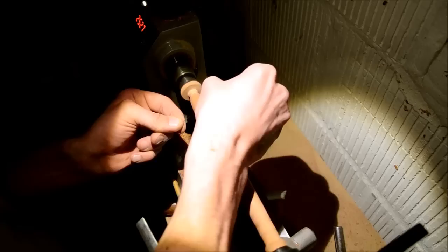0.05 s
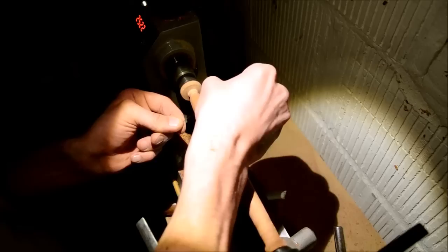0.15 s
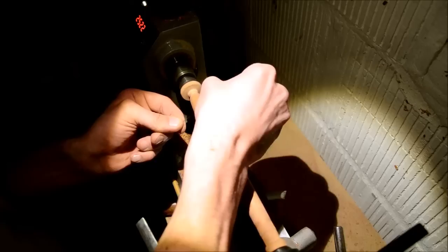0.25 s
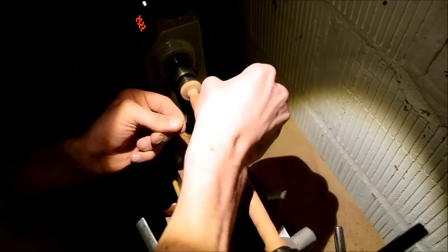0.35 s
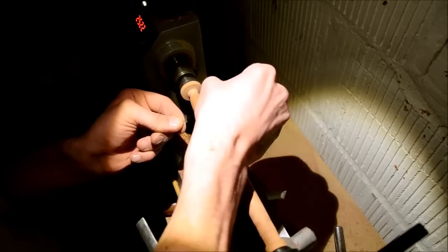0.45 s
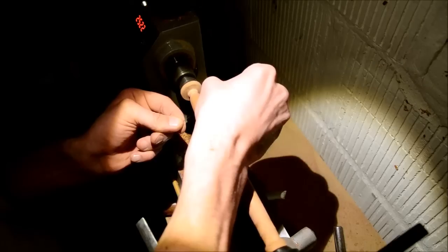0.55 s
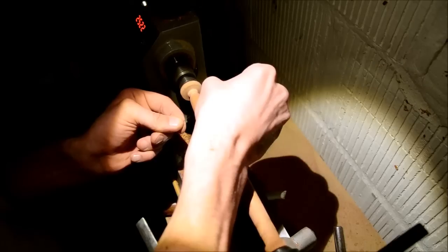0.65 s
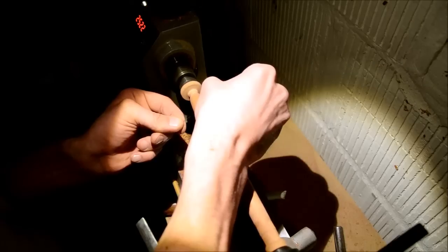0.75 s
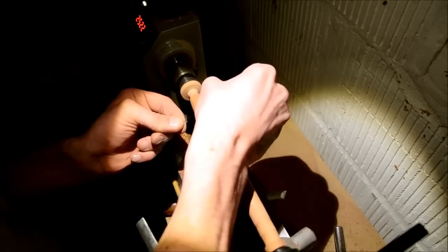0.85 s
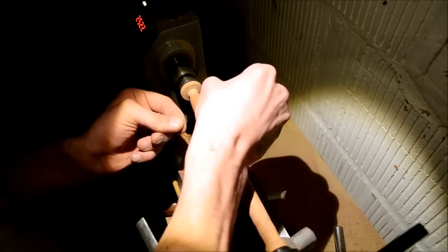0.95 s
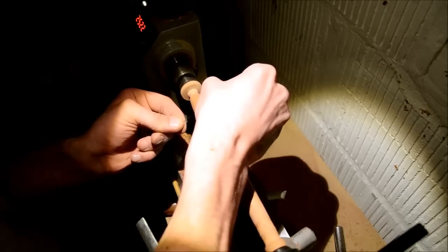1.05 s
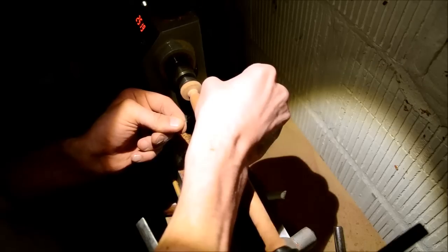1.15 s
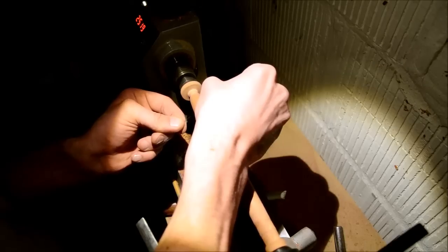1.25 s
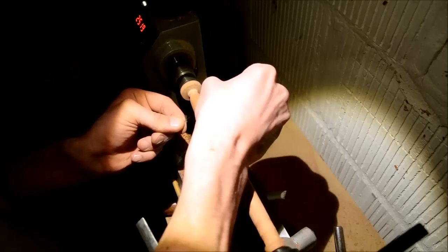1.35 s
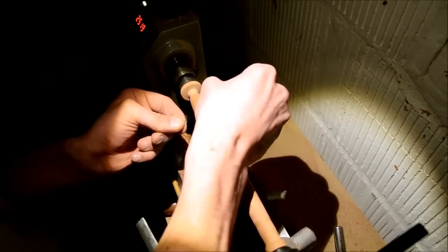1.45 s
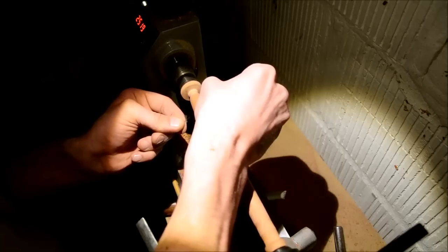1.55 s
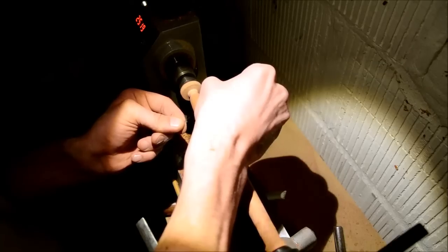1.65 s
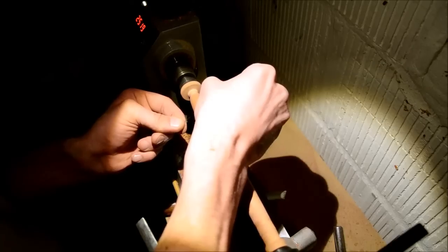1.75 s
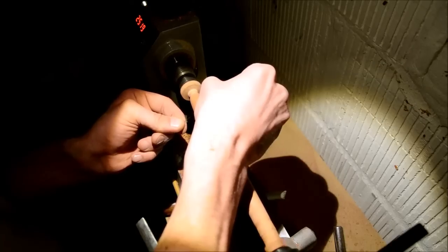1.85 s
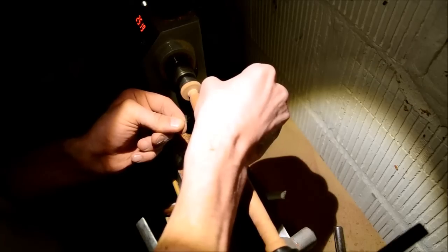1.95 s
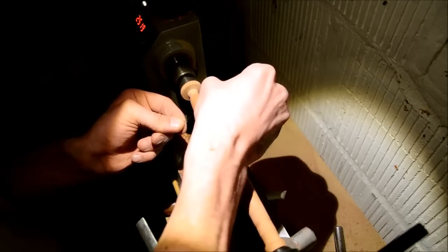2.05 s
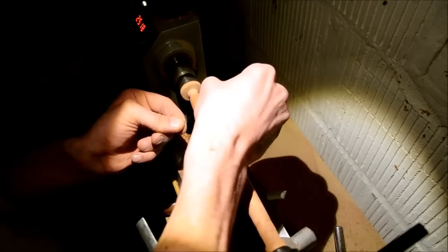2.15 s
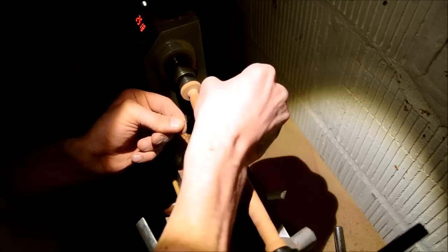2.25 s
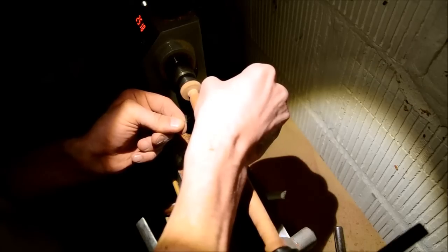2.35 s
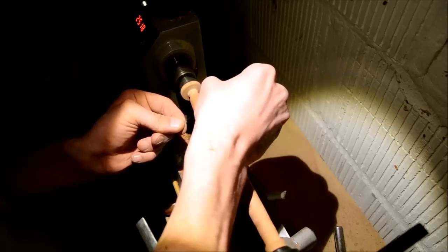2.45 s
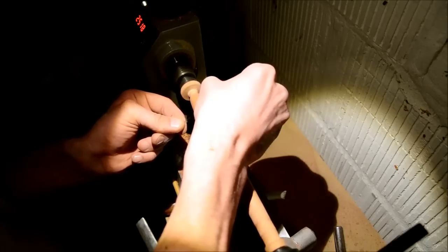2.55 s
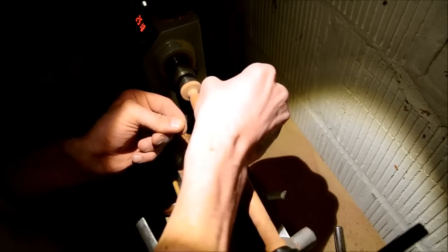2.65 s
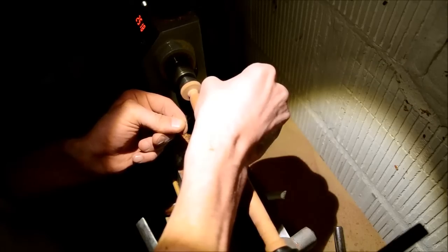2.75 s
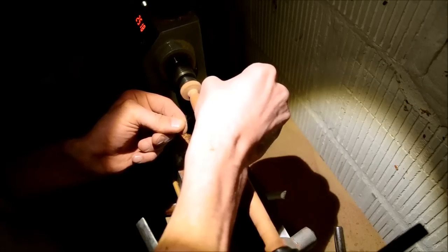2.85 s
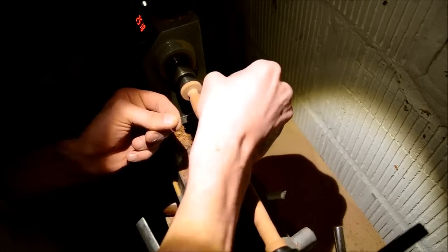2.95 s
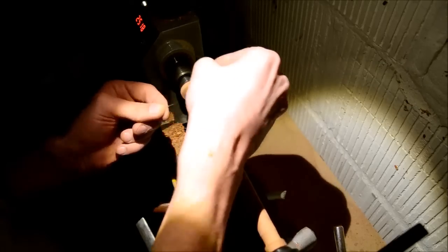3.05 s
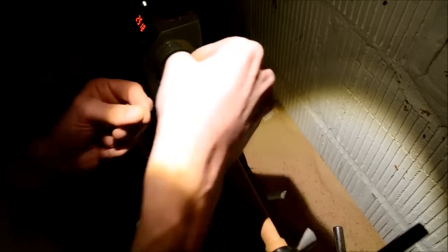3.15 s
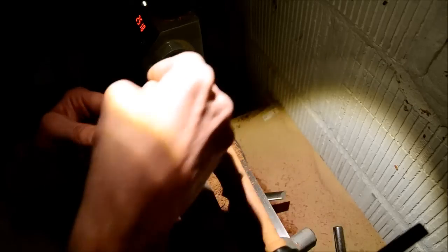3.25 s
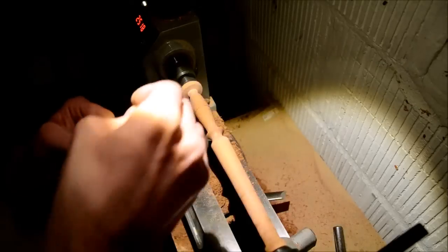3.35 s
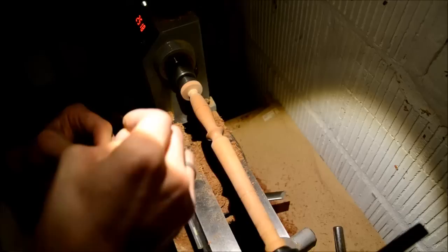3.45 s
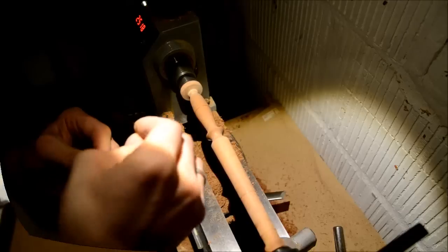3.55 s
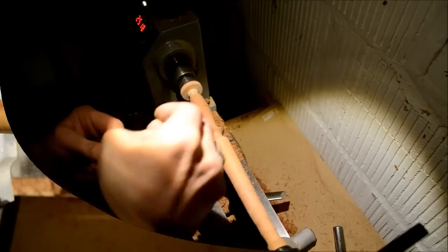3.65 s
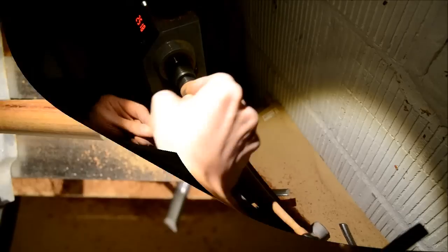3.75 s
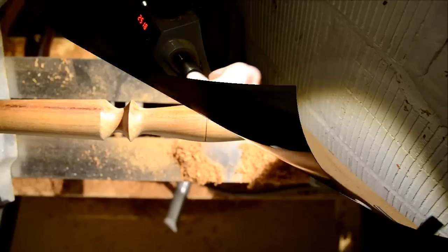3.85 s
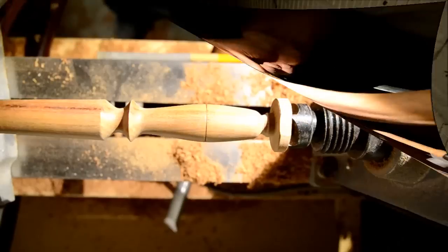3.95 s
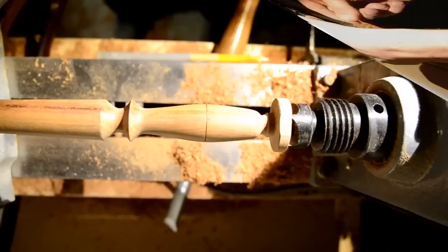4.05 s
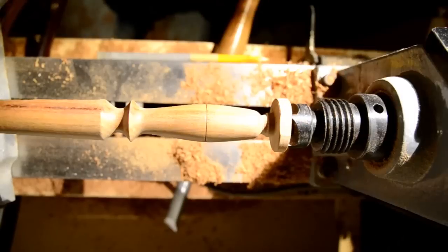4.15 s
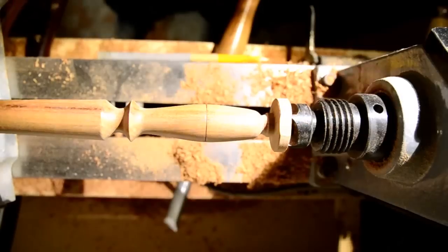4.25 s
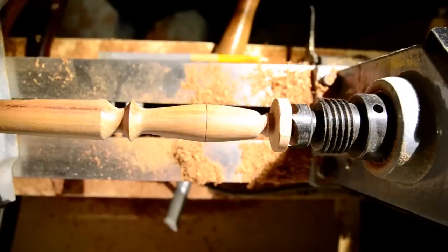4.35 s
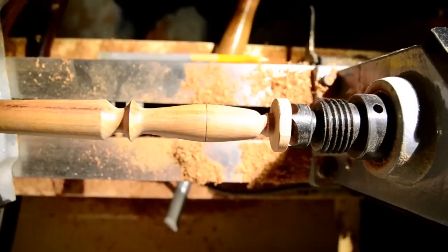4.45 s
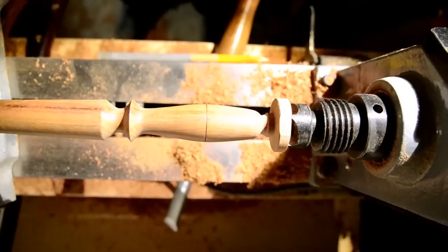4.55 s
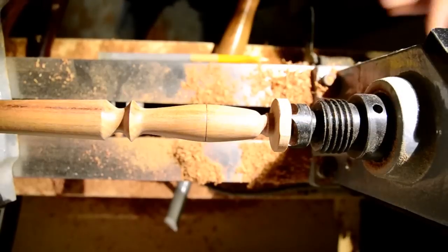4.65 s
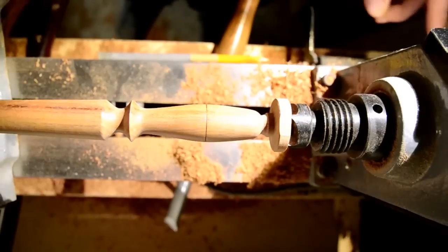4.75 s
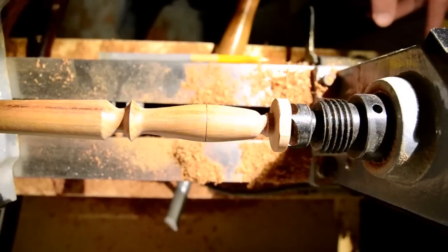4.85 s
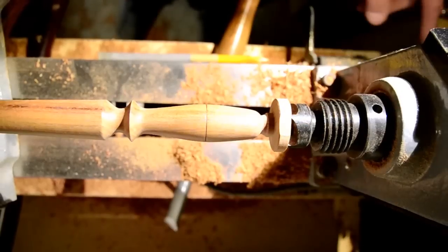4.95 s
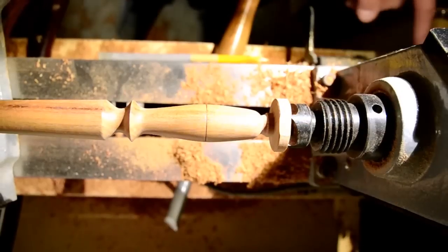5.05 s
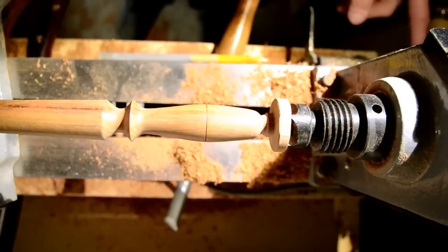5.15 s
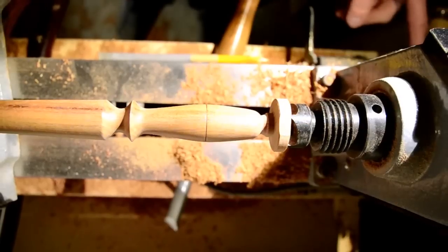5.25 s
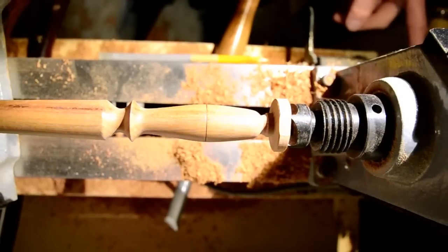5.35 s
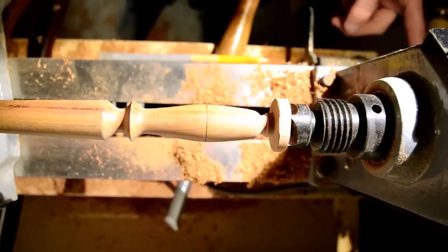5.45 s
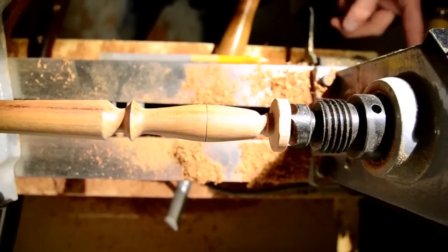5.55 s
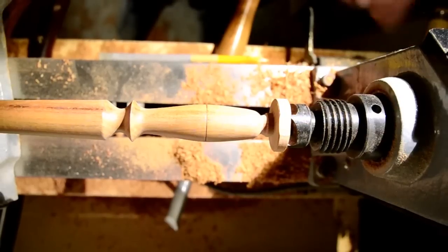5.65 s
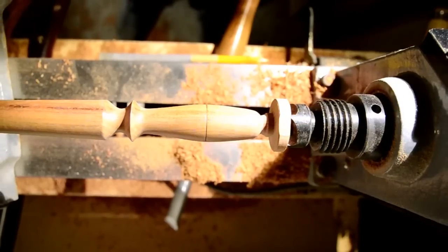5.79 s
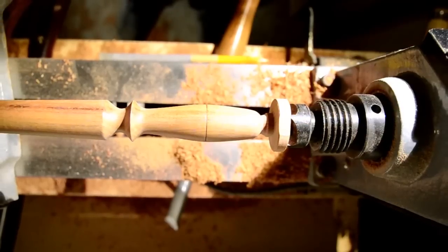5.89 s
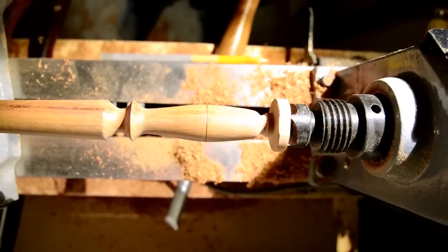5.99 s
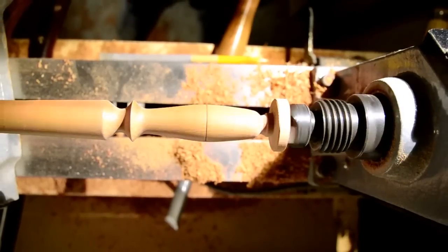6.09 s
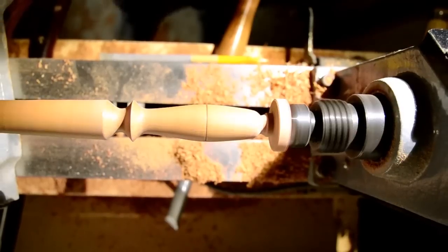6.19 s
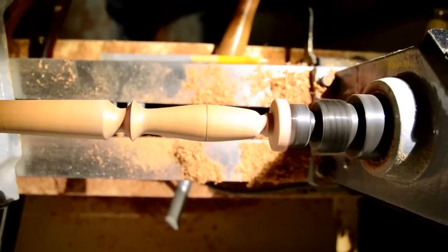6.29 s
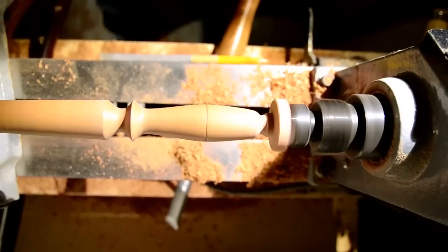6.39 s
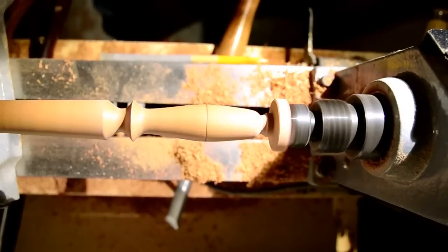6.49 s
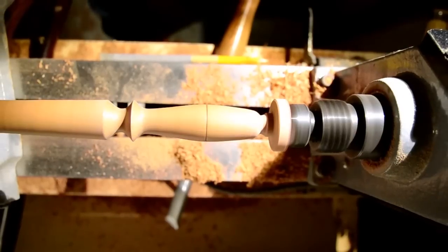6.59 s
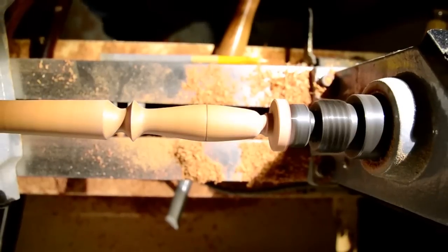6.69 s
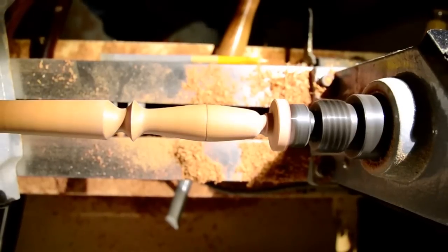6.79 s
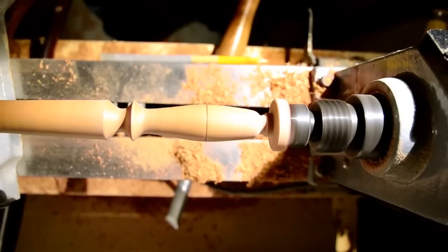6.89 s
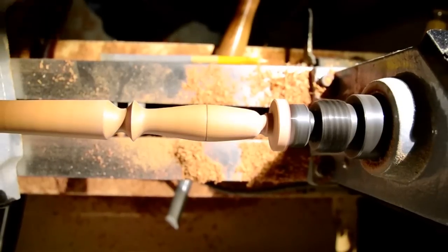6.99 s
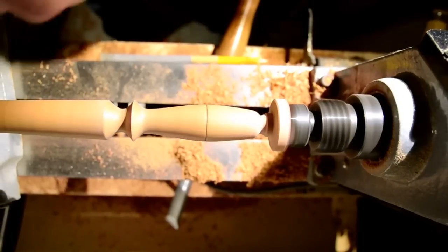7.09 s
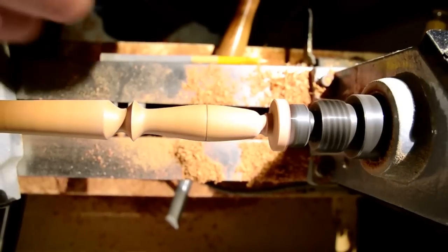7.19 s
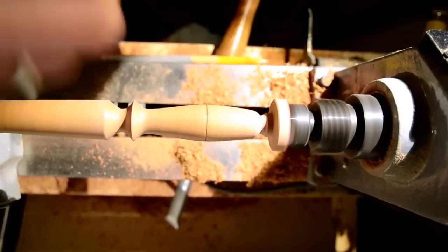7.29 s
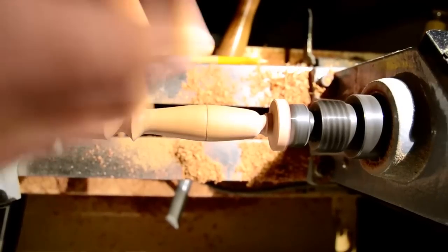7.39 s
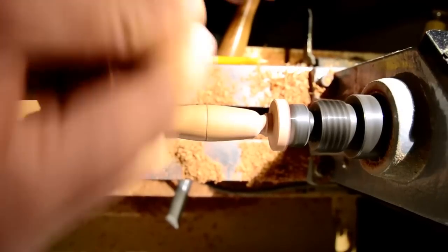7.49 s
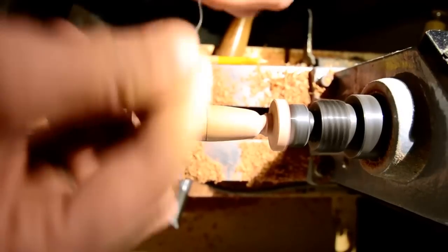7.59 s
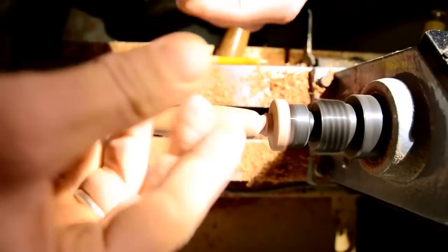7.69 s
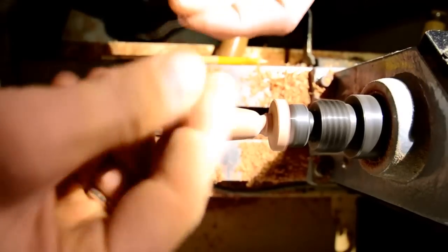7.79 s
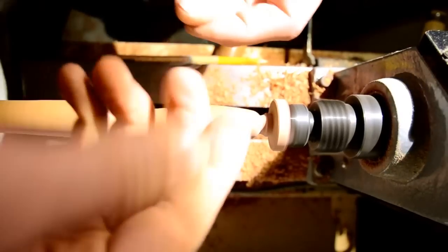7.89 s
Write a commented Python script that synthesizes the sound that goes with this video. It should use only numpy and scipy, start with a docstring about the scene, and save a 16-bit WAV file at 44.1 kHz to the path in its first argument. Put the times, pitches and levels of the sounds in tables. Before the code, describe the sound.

From 0 to 4.2 seconds a small wood lathe runs at constant speed, heard close up in a workshop: a steady hum around 350 hertz, beating slowly about twice a second, over a gritty rattle repeating roughly eleven times a second, with thin bearing whines and a tiny chirp each turn. Around 3.15 it grows very slightly louder. At 4.2 it cuts instantly to quiet room tone with faint mains hum. Sleeve rustles and swishes come between 4.2 and 5, with light taps, one duller near 4.9. At 5.43 the switch clacks sharply, with a small after-tap at 5.58. At about 6.06 the motor starts; its pitch climbs rapidly for a second, swelling through metallic resonances, then settles by 7 into a bright, rattling whir. Short loose-part buzzes chatter from 7.25 to the end near 8.

```python
"""A small wood lathe spins a wooden handle: drive tones beat slowly over a rattle that repeats every turn.
The sound then cuts to the lathe at rest, heard from beside the headstock: a sleeve rustles, the start
switch clacks and the spindle runs up to speed again. Tones and a repeating noise track follow the spindle's
turns through body resonances; shaped noise makes grit, cloth and room tone; short cracks make the switch."""
import sys
import numpy as np
from scipy import signal
from scipy.fft import rfft, irfft, next_fast_len
from scipy.io import wavfile
from scipy.ndimage import map_coordinates

SR = 44100
rng = np.random.default_rng(int(sys.argv[2]) if len(sys.argv) > 2 else 0)


def store_wav(level_fs):
    """Save 16-bit WAV to argv[1]."""
    pcm = np.round(np.clip(np.atleast_2d(level_fs), -1, 1) * 32767)
    wavfile.write(sys.argv[1], SR, pcm.T.astype(np.int16))


N = 349713
TIME = np.arange(N) / SR  # s

CUT, START = 4.1915, 6.06  # cut to the lathe at rest, and the motor starting (s)
FULL_SPEED = 10.94  # spindle speed with the hands on the wood (turns per s)
HUM_CYCLES = 32  # pulley hum (cycles per spindle turn)


def amp(db):
    """Turn dB into linear gain."""
    return 10 ** (np.asarray(db) / 20)


def unit(x):
    """Scale x to rms 1."""
    return x / np.sqrt(np.mean(x ** 2) + 1e-20)


def along(points, hz):
    """Read (Hz, value) points at hz, joined by straight lines on a log frequency axis."""
    f, value = np.transpose(points)
    return np.interp(np.log(hz + 1), np.log(f + 1), value)


def wobble(rate):
    """A smooth random curve with rate knots a second."""
    knots = rng.standard_normal(int(N * rate / SR) + 4)
    return map_coordinates(knots, [TIME * rate])


def coloured(x, gain_db):
    """Filter x by a dB function of frequency, with padding for the ringing."""
    n = len(x)
    padded = next_fast_len(n + SR // 5)
    gain = amp(gain_db(np.fft.rfftfreq(padded, 1 / SR)))
    return irfft(rfft(x, padded) * gain, padded)[:n]


def noise(spectrum):
    """Noise of rms 1 with the given colour."""
    return unit(coloured(rng.standard_normal(N), lambda hz: along(spectrum, hz)))


def lathe(level_db, beside, chirp_at, repeat_db, tones_db, chirp_db, dull_db, bass_db):
    """Rattle of bumps and grit through the lathe's body, with its drive tones and a chirp once a turn."""
    # colour of the rattle ahead of the body: f/Hz, level/dB per Hz
    rattle_colour = [(25, -40), (100, -26), (150, -22.5), (195, -10), (240, -7.5), (360, -2), (680, -7.5),
                     (1200, -5.5), (2800, 1), (5000, -5), (7000, -7), (9500, -13.5), (10600, -21),
                     (11500, -52)]
    # bearing chirp: f/Hz, level/dB per Hz
    chirp_colour = [(20, -120), (6500, -48), (8500, 2.5), (10200, 1), (11000, -7), (11700, -27),
                    (13000, -70)]
    turns, pace = turns_since(chirp_at), spindle_pace()
    repeating = track(turns + 0.00015 * wobble(12))
    grit = rng.standard_normal(N) * amp(1.07 * wobble(500) + 0.73 * wobble(25))
    grit = coloured(grit, lambda hz: along([(150, -2.2), (1200, -2.1), (4000, -0.5)], hz))
    contacts = amp(repeat_db) * repeating + grit
    rattle = coloured(contacts, lambda hz: along(rattle_colour, hz) + body_db(hz, beside))

    # at low speed the contacts are softer and the bed hardly shakes: treble and bass come in with speed
    bass = coloured(rattle, lambda hz: -10 * np.log10(1 + (hz / 420) ** 8))
    treble = rattle - coloured(rattle, lambda hz: -10 * np.log10(1 + (hz / 2300) ** 4))
    lag = pace ** 2 - 1  # -1 at rest, 0 at full speed
    balanced = rattle + bass * (amp(bass_db * lag) - 1) + treble * (amp(dull_db * lag) - 1)
    rattle = balanced / np.std(rattle)

    tones = drive_tones(turns, pace, waver_db=3, slip=0.00042)
    tones = coloured(tones, lambda hz: body_db(hz, beside) + along([(45, -30), (62, 1.0)], hz))
    once_a_turn = np.exp(6 * (np.cos(2 * np.pi * turns) - 1))
    chirp = once_a_turn * noise(chirp_colour)
    return amp(level_db) * shaking(pace) * (rattle + amp(tones_db) * tones + amp(chirp_db) * chirp)


def track(turns, count=2000, size=32768):
    """Bumps of belt and bearing races: one random profile, passed again at every turn."""
    phases = np.exp(2j * np.pi * rng.random(count))
    strengths = rng.rayleigh(size=count) * (np.arange(count) > 0)  # no constant offset
    profile = irfft(phases * strengths, size)
    return unit(map_coordinates(profile, [turns % 1 * size], order=1, mode="grid-wrap"))


def drive_tones(turns, pace, waver_db, slip):
    """Shaft and bearing tones grow with speed; the higher ones smear as the belt creeps."""
    # weaker drive tones: cycles per spindle turn, relative level/dB
    orders = [(6, -67), (7.69, -70), (12.5, -72), (17.48, -61), (24, -60), (25, -59), (26, -60),
              (26.89, -57), (36, -61), (48, -55.5), (50, -58), (74, -57), (82.4, -56), (90, -57),
              (103, -50), (118, -54), (123.6, -56), (144.2, -55), (164.8, -59), (179.4, -52), (190.2, -59),
              (193.2, -59), (321, -57)]
    creep = slip * wobble(7)  # turns
    tones = 0
    for cycles, db in orders:
        gain = amp(db + waver_db * wobble(6))
        tones = tones + gain * np.sin(2 * np.pi * (cycles * (turns + creep) + rng.random()))
    return np.sqrt(2) * pace * tones


def body_db(hz, beside):
    """Gain of bed and headstock resonances, heard beside the headstock or from the tailstock end."""
    # resonances: f/Hz, width/Hz, gain from the tailstock end/dB, gain beside the headstock/dB
    resonances = [(285, 42, 11, 15.5), (408, 50, 6, -1), (458.7, 26, -0.5, 11), (556, 28, -1.5, 1),
                  (814.2, 17.4, 9, 14), (1038, 120, 3.5, 6.5), (1187, 40, 3, 5), (1443, 120, 5.5, 8.5),
                  (1590, 27, 4.5, 8), (1770, 116, 7.5, 7), (2101, 60, 9.5, 6), (2563, 63, 5, 10),
                  (2737, 97, 7, 9.5), (3500, 44, 8.5, 9), (3870, 750, -3, -0.5), (3990, 33, 5.5, -5),
                  (4530, 27, -10, 4), (4580, 120, 2.5, -1), (5100, 69, 0.5, 6.5), (6440, 730, -3.5, -2.5),
                  (7950, 340, -9, -15)]
    gain_db = 0
    for centre, width, far_db, near_db in resonances:
        peak_db = near_db if beside else far_db
        gain_db = gain_db + peak_db / (1 + (2 * (hz - centre) / width) ** 4)
    return gain_db


def spindle_pace():
    """Share of FULL_SPEED: near 1 before the cut, then rising from rest once the motor starts."""
    free_gain = 0.05  # speed gained when the hands lift off the wood (turns per s)
    # main time constant (s), then share and time constant (s) of a slow last creep
    spin_up_s, creep_share, creep_s = 0.231, 0.06, 0.6
    t = np.maximum(TIME - START, 0)
    missing = (1 - creep_share) * np.exp(-t / spin_up_s) + creep_share * np.exp(-t / creep_s)
    return np.where(TIME < CUT, 1 + free_gain / FULL_SPEED * free(), 1 - missing)


def turns_since(s):
    """Spindle turns counted from time s, by summing the speed."""
    turns = np.cumsum(FULL_SPEED * spindle_pace()) / SR
    return turns - np.interp(s, TIME, turns)


def free():
    """0 while the hands rest on the wood, rising to 1 as they lift; 0 again after the cut."""
    lift_at, lift_s = 3.15, 0.12  # when and how gradually (s)
    return (1 + np.tanh((TIME - lift_at) / lift_s)) / 2 * (TIME < CUT)


def shaking(pace):
    """Vibration grows with the square of the speed, then levels off."""
    knee = 0.62  # share of full speed below which the vibration dies away
    return pace ** 2 / np.hypot(pace ** 2, knee ** 2)


def hum(level_db, in_step_at, motor_db, flutter_db, slip):
    """Pulley and slightly slower motor tone beat about twice a second, faster while the belt slips."""
    motor_cycles = 31.802  # per spindle turn
    free_hum_db, free_motor_db = 0.5, 3  # undamped by the hands, hum and its motor tone grow
    turns, pace = turns_since(in_step_at), spindle_pace()
    slipped = slip * (np.interp(in_step_at, TIME, pace) - pace)  # cycles
    pulley = np.sin(2 * np.pi * HUM_CYCLES * turns)
    motor = np.sin(2 * np.pi * (motor_cycles * turns + slipped))
    gain = shaking(pace) * amp(level_db + free_hum_db * free() + flutter_db * wobble(22))
    return np.sqrt(2) * gain * (pulley + amp(motor_db + free_motor_db * free()) * motor)


def whines():
    """Motor drone, motor whine and bearing whine follow the spindle; their phase flutters with the belt."""
    # the three tones in that order: cycles per spindle turn
    tone_cycles = (16, 64, 128)
    # the same three, ahead of swells and shaking: level from the tailstock end/dB,
    # level beside the headstock/dB, waver/dB, phase roughness/rad per (turn/s^2)
    tone_levels = [(-59, -60, 0, .05), (-48.5, -49, 2, .08), (-48.5, -50, 2, .55)]
    turns, pace, out = turns_since(START), spindle_pace(), 0
    # the belt flaps while it accelerates (turns/s^2, kept within limits)
    straining = np.clip(np.gradient(FULL_SPEED * pace) * SR, .3, 3)
    for cycles, (far_db, near_db, waver_db, rough) in zip(tone_cycles, tone_levels):
        db = np.where(TIME < CUT, far_db, near_db + swell_db(cycles)) + waver_db * wobble(25)
        out = out + amp(db) * np.sin(2 * np.pi * cycles * turns + rough * straining * wobble(45))
    return np.sqrt(2) * shaking(pace) * out


def swell_db(cycles):
    """Gain beside the headstock of a tone, in cycles per turn, as it climbs through narrow resonances."""
    # headstock resonances: f/Hz, width/Hz, gain/dB
    swells = [(135, 14.6, 11), (171.6, 12.6, 8), (290.5, 12, 22.5), (348.8, 42, 18.5), (474, 40, 18),
              (566, 36, 18), (620, 30, 11), (674, 14, 8), (1205, 50, 19), (1310, 30, 6), (1369, 32, 11.5)]
    hz = cycles * FULL_SPEED * spindle_pace()
    return sum(db / (1 + (2 * (hz - centre) / width) ** 2) for centre, width, db in swells)


def shudder():
    """Passing orders keep one group of bed modes ringing until the speed has nearly settled."""
    # ringing of the bed: f/Hz, level/dB per Hz
    bed_modes = [(20, -90), (700, -41), (930, -14), (1030, -11), (1130, -20), (1192, 0.5), (1250, -15),
                 (1500, -43), (6000, -90)]
    ends = 0.065  # share of speed still missing when the ringing lets up
    pace = spindle_pace()
    sweeping = (1 - pace) ** 2 / np.hypot((1 - pace) ** 2, ends ** 2)
    return amp(-33) * shaking(pace) * sweeping * noise(bed_modes)


def buzz(level_db, length):
    """Near full speed a loose part chatters in short bursts on two resonances."""
    # bursts: t/s, relative peak level/dB
    chatter = [(7.2454, -15.5), (7.4394, -10.5), (7.5492, -18), (7.6194, -11), (7.7144, -13),
               (7.7707, -11.5)]
    bursts = sum(amp(db) * np.exp(-((TIME - s) / length) ** 2) for s, db in chatter)
    ring = noise([(20, -120), (2200, -40), (2470, -12), (2540, 10), (2620, -21),
                  (2790, 10), (2880, -27), (3200, -23), (8000, -80)])
    return amp(level_db) * bursts * ring


def taps(ring_db, rise):
    """Each contact is a short crack that rings the switch housing, heard in a band of its own width."""
    # switch clacks and small handling taps:
    # t/s, level/dB, centre f/Hz, fall-off one octave away/dB, t60/s
    contacts = [(4.213, -51, 1400, 5, 0.11), (4.266, -48, 7000, 7, 0.074), (4.503, -51, 500, 14, 0.075),
                (4.537, -47, 800, 6, .11), (4.938, -41, 1450, 26, 0.021), (5.312, -53, 600, 4, .08),
                (5.427, -31.5, 1800, 2, 0.053), (5.4362, -22.5, 2500, 1.5, 0.034),
                (5.4414, -24.5, 1200, 1, 0.064), (5.572, -51, 1100, 1.5, 0.054),
                (5.58, -43.5, 1100, 1.5, 0.11)]
    # colour of the crack: f/Hz, level/dB per Hz
    crack_colour = [(20, -60), (100, -30), (450, -10), (780, -2), (1000, -11.5), (1550, -11), (1900, -7.5),
                    (2500, -16), (3100, -22), (3800, -15.5), (5400, -29), (7400, -19), (10200, -17),
                    (11600, -52)]
    # housing modes: f/Hz, level/dB, t60/s
    housing = [(553, -12, 0.053), (720, -3, .06), (827, 0, 0.055), (1043, -2, .06), (1876, 0, .08),
               (2080, -11, 0.072), (2660, -9, .06), (4650, -14, .1), (7260, -8, .1)]
    out, t = np.zeros(N + SR), np.arange(SR // 3) / SR
    for s, db, centre_hz, fall_db, t60 in contacts:
        crack = unit(coloured(rng.standard_normal(len(t)), lambda hz: along(crack_colour, hz)))
        ring = 0
        for hz, level, life in housing:
            ring = ring + amp(level - 60 * t / life) * np.sin(2 * np.pi * (hz * t + rng.random()))

        def band(hz):
            """Gain falling with the square of the distance in octaves."""
            return -abs(fall_db) * np.log2((hz + 1) / centre_hz) ** 2

        blow = coloured(crack * amp(-60 * t / t60) + amp(ring_db) * ring, band)
        blow = blow / np.std(coloured(crack, band))
        start = round(s * SR)
        out[start:start + len(t)] += amp(db) * blow * (1 - np.exp(-t / rise))
    return out[:N]


def workshop(x):
    """Reverberation of a small room: noise that dies away at its own rate in each band."""
    # decay: f/Hz, t60/s
    decay = [(200, 0.28), (2000, 0.29), (10000, 0.25)]
    hz, t, bands = signal.stft(rng.standard_normal(SR // 2), SR, nperseg=256)
    fading = bands * amp(-60 * t / along(decay, hz)[:, None])
    tail = signal.istft(fading, SR, nperseg=256)[1]
    return signal.fftconvolve(x, tail / np.linalg.norm(tail))[:N]


def at_rest():
    """Room tone with a faint mains hum, and a sleeve whose strokes mix a dull rub and a bright swish."""
    # sleeve strokes: t/s, half length/s, level/dB, share of bright swish (0-1)
    strokes = [(4.212, .05, -57.5, 0), (4.44, 0.14, -54, 0.44), (4.667, 0.082, -55.5, 1),
               (4.814, 0.04, -54, 0.4), (4.962, 0.076, -62.5, 0.5), (5.33, 0.056, -62, .1),
               (5.416, 0.017, -50, 0)]
    # dull rub of cloth: f/Hz, level/dB per Hz
    rub_colour = [(100, -28), (450, 2), (800, -4), (2500, -3.5), (5000, -13), (10000, -17), (11600, -42)]
    # bright swish of cloth: f/Hz, level/dB per Hz
    swish_colour = [(100, -44), (1500, -2.5), (5000, -7), (7900, -8), (9500, -4), (11600, -25)]
    # quiet workshop: f/Hz, level/dB per Hz
    room_colour = [(20, -32), (90, -9), (180, -4), (320, -1), (600, -1.5), (1200, -4), (3300, -10.5),
                   (6000, -15.5), (7900, -20), (9500, -15), (11500, -34)]
    mains = amp(-67.0) * np.sin(2 * np.pi * 300 * TIME)
    dull, bright, sleeve = noise(rub_colour), noise(swish_colour), 0
    for s, length, db, swish in strokes:
        share = np.clip(swish, 0, 1)
        cloth = np.sqrt(1 - share) * dull + np.sqrt(share) * bright
        sleeve = sleeve + amp(db) * np.exp(-((TIME - s) / length) ** 2) * cloth
    return amp(-62.5) * noise(room_colour) + mains + amp(1.9 * wobble(70)) * sleeve


def scene():
    """The running lathe, then the pause and the run-up; both channels alike."""
    # rattle ahead of shaking: level from the tailstock end/dB, level beside the headstock/dB
    far_db, near_db = (-30, -27)
    free_rattle_db = 0.45  # undamped by the hands, the rattle grows
    steady = lathe(far_db + free_rattle_db * free(), beside=False, chirp_at=2.03, repeat_db=-1,
                   tones_db=29.0, chirp_db=-11, dull_db=-8, bass_db=2)
    steady = steady + hum(level_db=-28.0, in_step_at=2.228, motor_db=-8.0, flutter_db=0.27, slip=0)

    run_up = lathe(near_db, beside=True, chirp_at=7.341, repeat_db=-4.5,
                   tones_db=27.5, chirp_db=-13, dull_db=9.5, bass_db=2)
    run_up = run_up + hum(level_db=-51.0 + swell_db(HUM_CYCLES), in_step_at=7.29,
                          motor_db=-5.5, flutter_db=1.5, slip=4.47)
    run_up = run_up + shudder() + buzz(level_db=-17.0, length=0.032)

    clacks = taps(ring_db=-14.5, rise=.0006)
    later = at_rest() + clacks + amp(-7) * workshop(clacks) + run_up
    mono = np.where(TIME < CUT, steady, later) + whines()
    return np.tile(mono, (2, 1))


def record(dry):
    """The camera's microphone track keeps next to nothing above its band limit."""
    top_hz = 11650
    return np.array([coloured(side, lambda hz: -120.0 * (hz > top_hz)) for side in dry])


dry = scene()
out = record(dry)
store_wav(out)
```